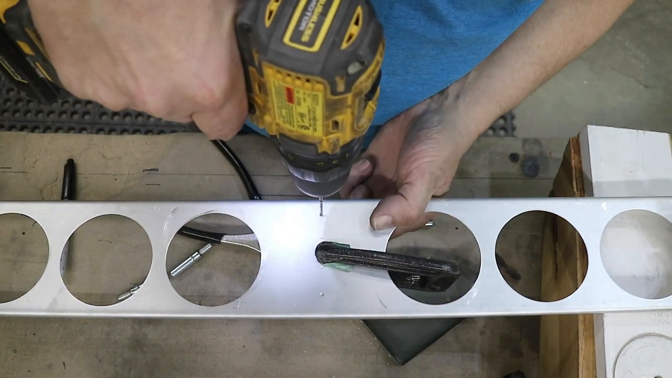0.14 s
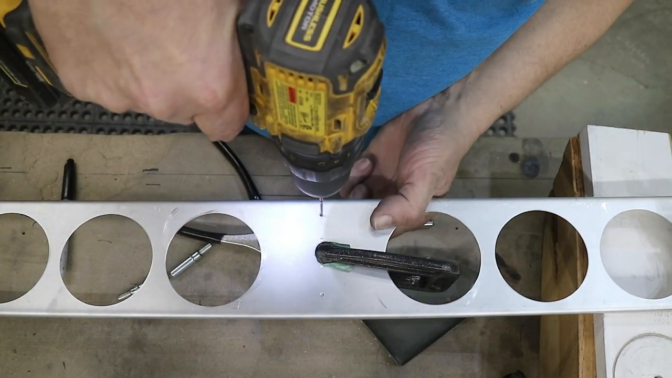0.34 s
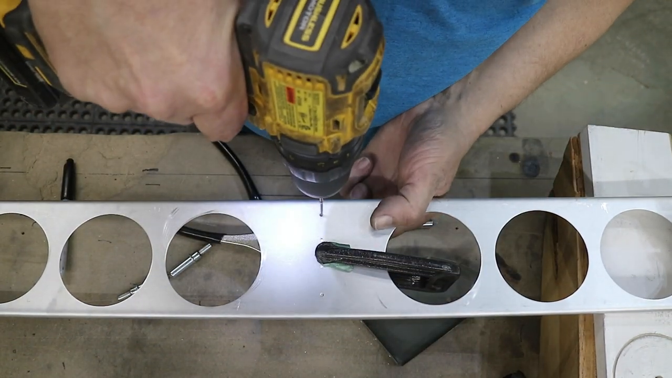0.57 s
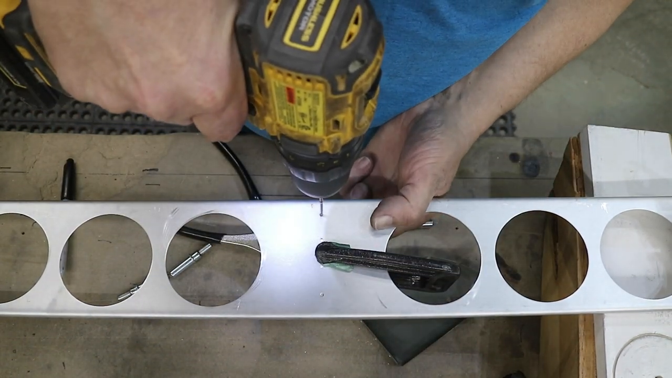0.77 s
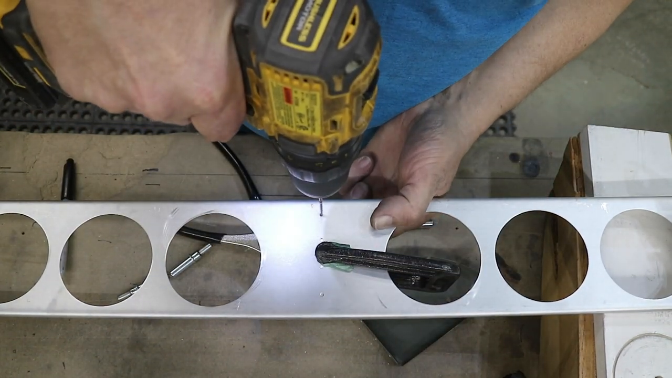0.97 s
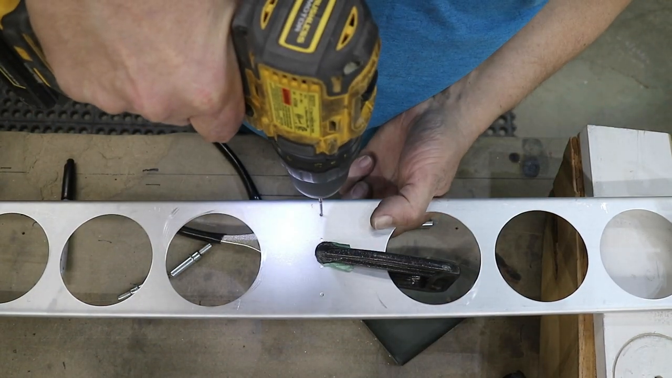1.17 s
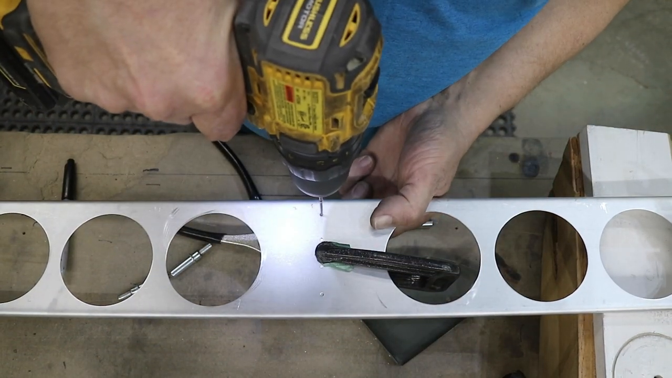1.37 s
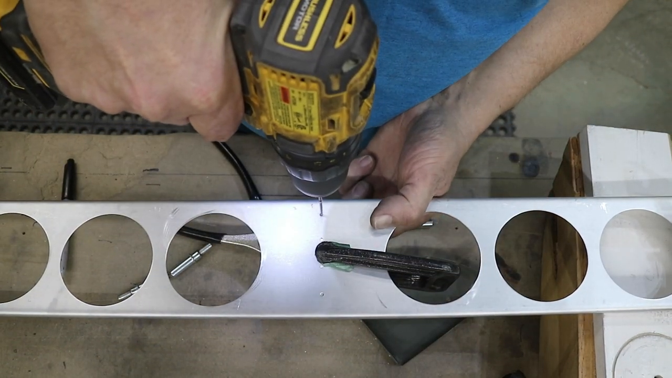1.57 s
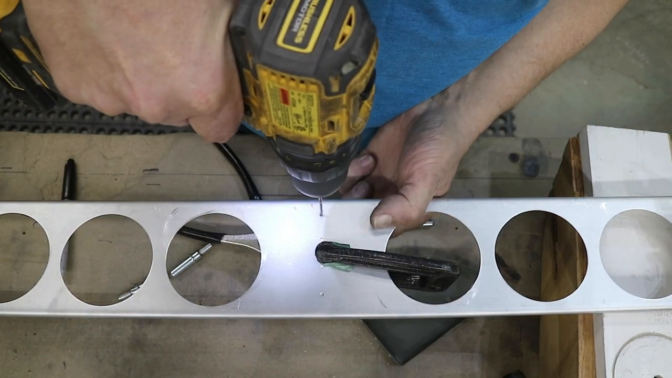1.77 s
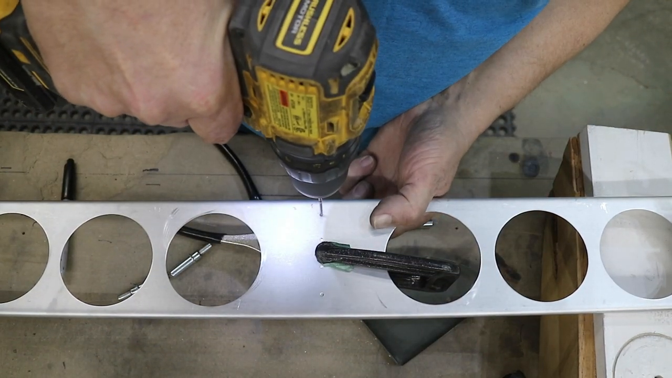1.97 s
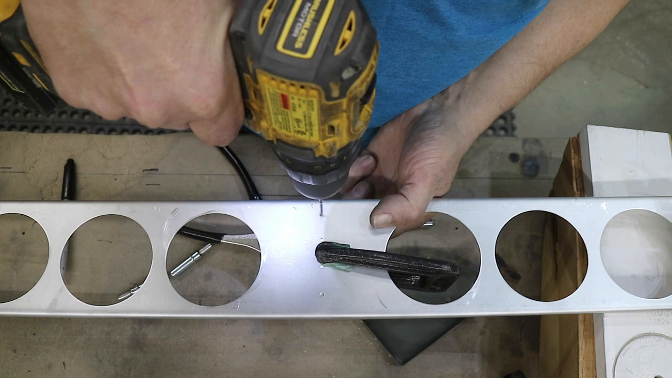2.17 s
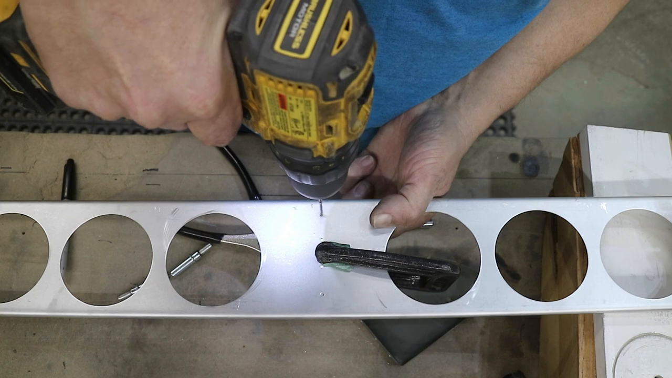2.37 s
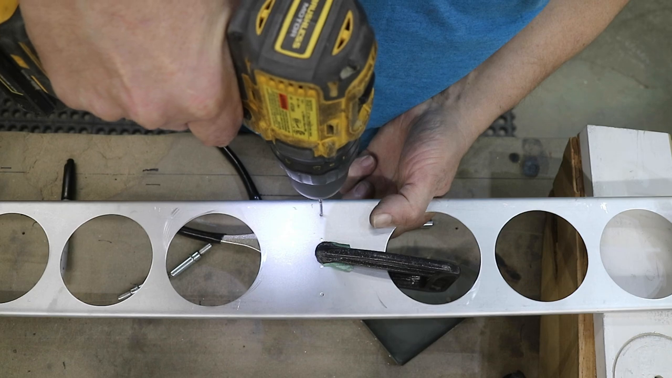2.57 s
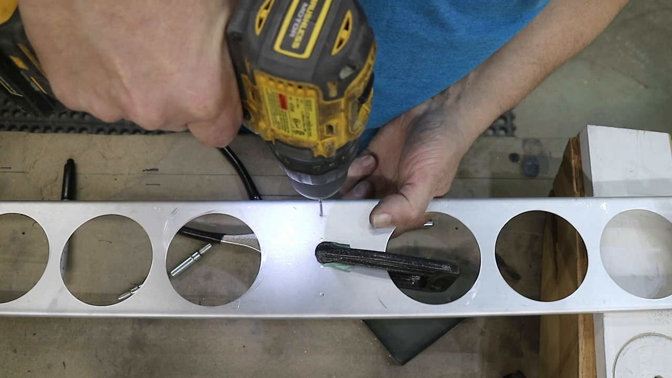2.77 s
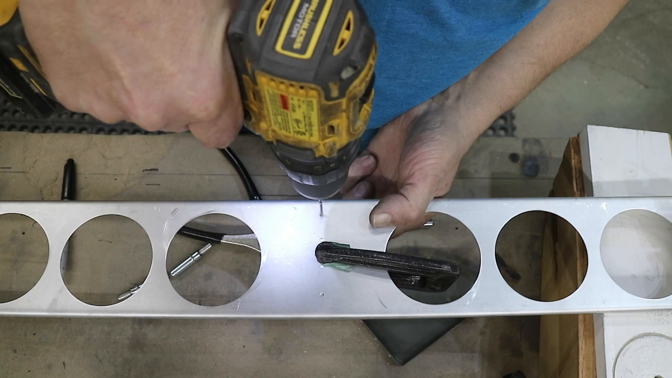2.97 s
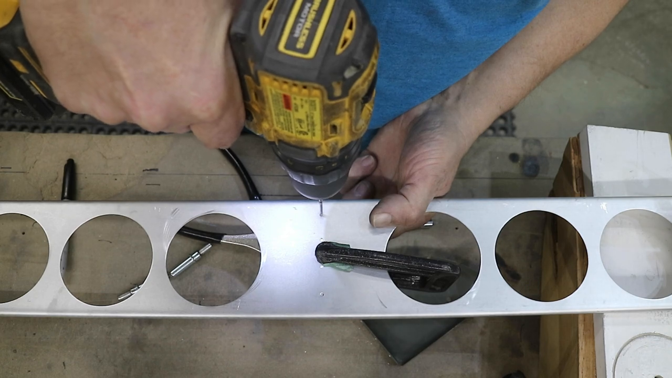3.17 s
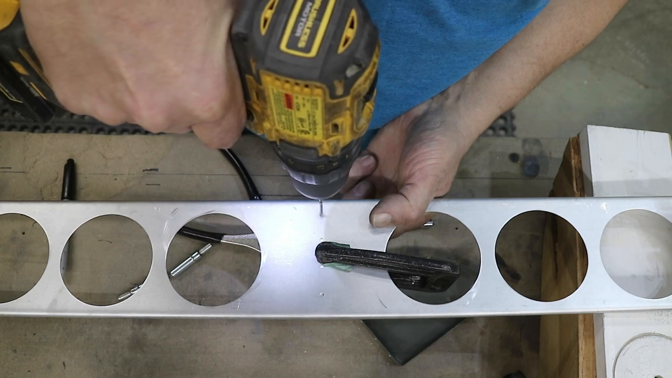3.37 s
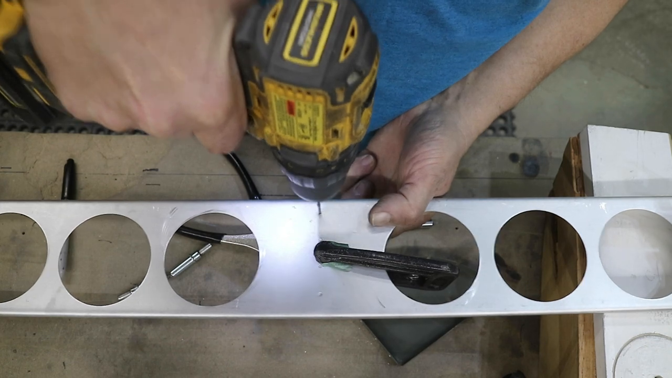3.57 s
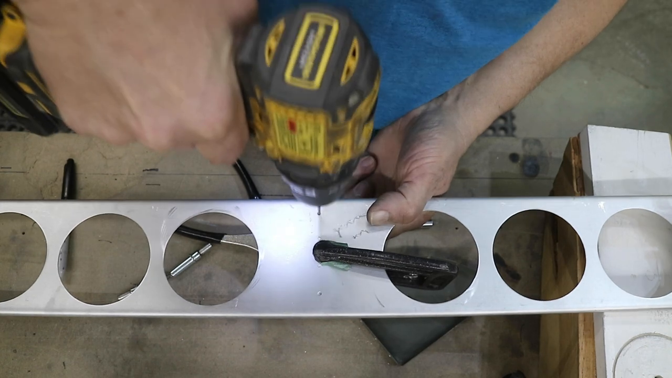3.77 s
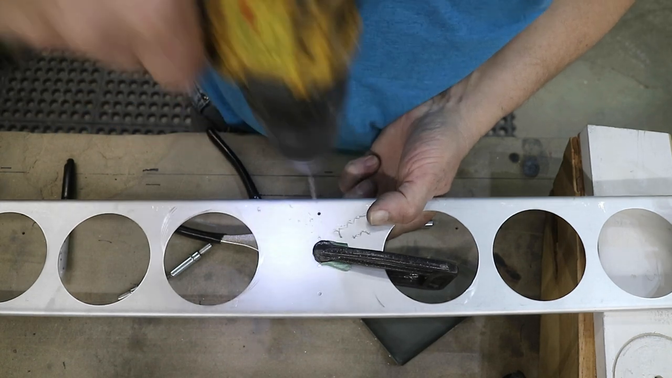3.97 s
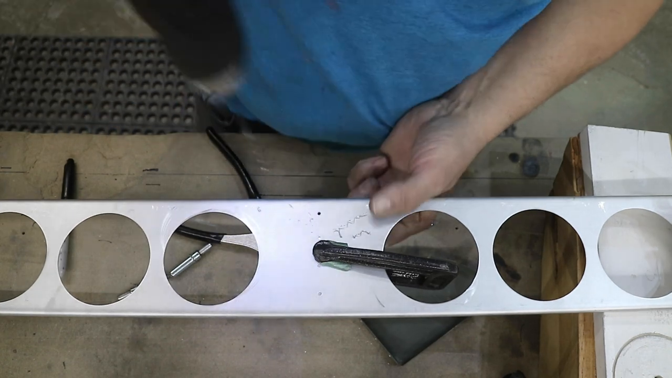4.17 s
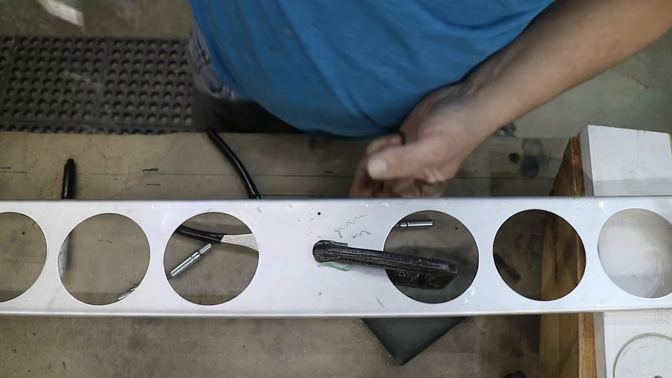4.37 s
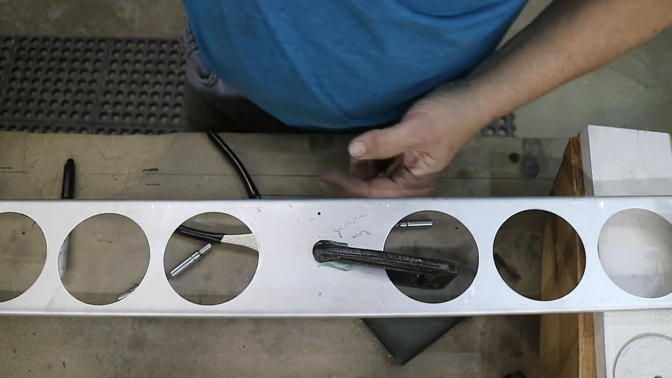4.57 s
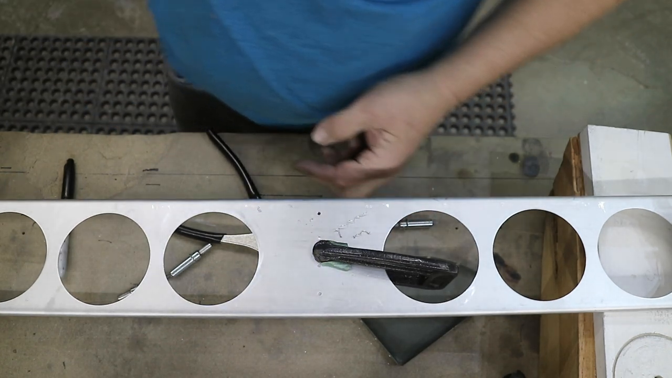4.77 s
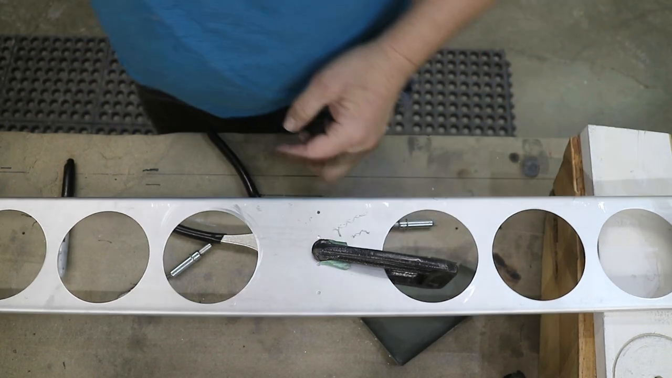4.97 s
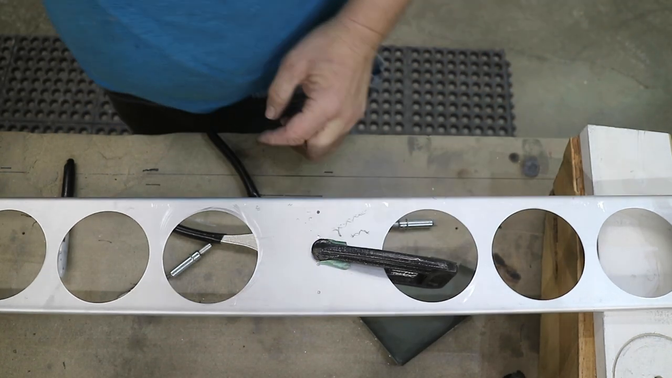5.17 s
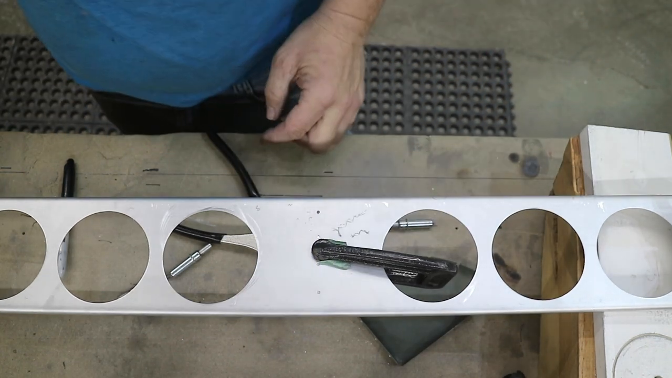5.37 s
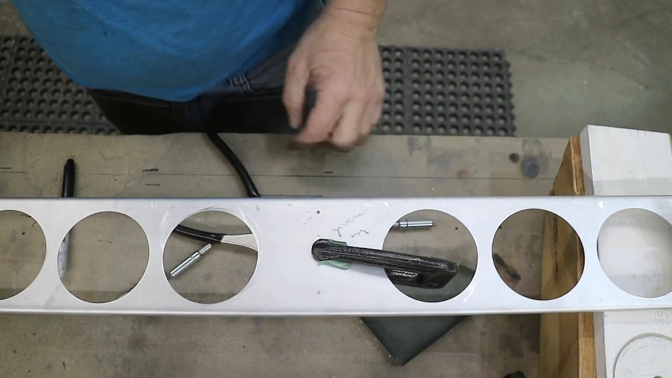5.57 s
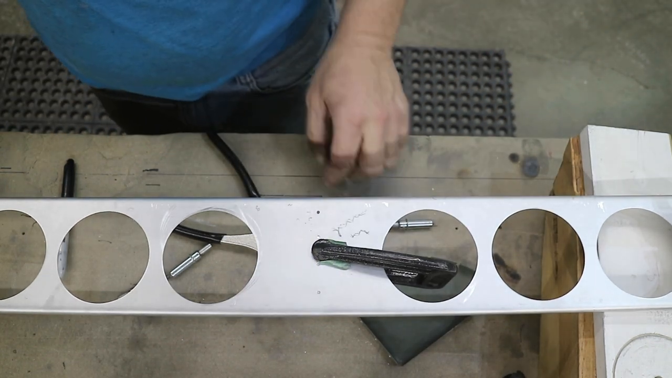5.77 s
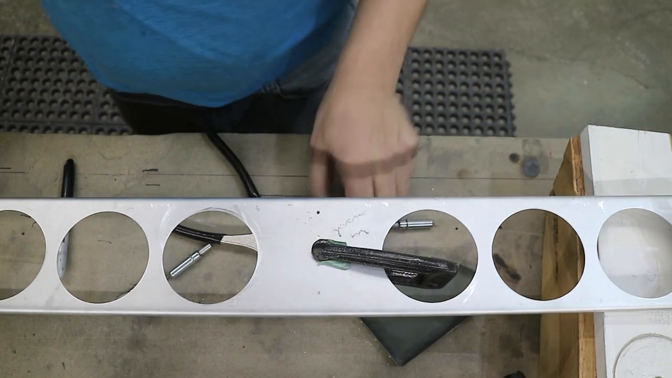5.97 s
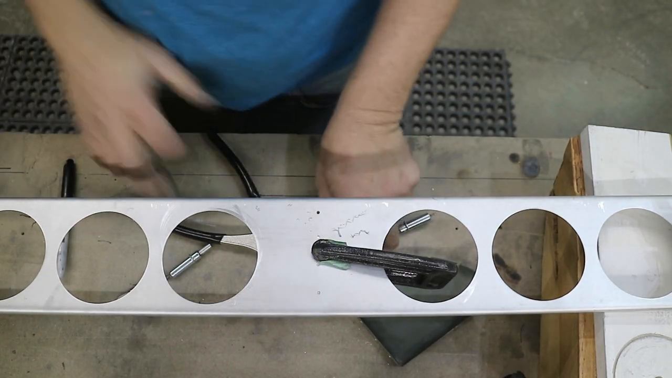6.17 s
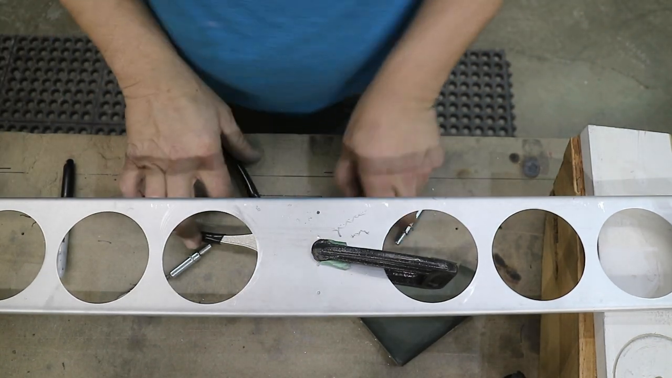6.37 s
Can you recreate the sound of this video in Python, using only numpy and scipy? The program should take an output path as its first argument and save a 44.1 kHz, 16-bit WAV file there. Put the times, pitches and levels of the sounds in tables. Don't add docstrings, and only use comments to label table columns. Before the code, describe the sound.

Close stereo sound in a workshop with a short room ring, faint low air and a thin distant machine tone. From 0 s a cordless drill starts low with a loose, growling chuck and a few light clicks, racing upward to full speed by about 0.5 s. Until 3.6 s it holds a piercing, nearly constant high whine with gear buzz, fan hiss and gritty tearing of thin aluminium. At 3.6 s the bit breaks through; until 3.95 s it snags, shudders and gives several short squeaks, the loudest near 3.85 s. The whine runs free, then brakes from 4.05 s, plunging to a stop with a click at 4.27 s. Quiet follows, with a soft touch at 4.85 s. At 4.95 s the drill knocks hard on the wooden bench and metal clatters brightly until 5.2 s. More woody knocks come at 5.5 s, tiny ticks afterward, then faint bumps and a small dull scrape from 6.1 to 6.4 s.

```python
import sys
import numpy as np
from scipy import signal
from scipy.fft import rfft, irfft, next_fast_len
from scipy.io import wavfile
from scipy.ndimage import map_coordinates

SR = 44100
rng = np.random.default_rng(int(sys.argv[2]) if len(sys.argv) > 2 else 0)


def decibels_to_gain(level_db):
    exponent = np.asarray(level_db, float) / 20
    return 10 ** exponent


def wrap_up_sound(samples):
    columns = np.atleast_2d(samples).T
    tamed = np.clip(columns, -1, 1)
    steps = np.round(tamed * 32767).astype(np.int16)
    wavfile.write(sys.argv[1], SR, steps)


N = 284004
THROUGH_S, BRAKE_S, STOP_S = 3.62, 4.056, 4.275


def unit(x):
    return x / np.sqrt(np.mean(x ** 2) + 1e-20)


def along(points, hz):
    f, v = np.transpose(points)
    return np.interp(np.log(hz + 1), np.log(f + 1), v)


def curves(rows, outside=None):
    s, *cols = np.transpose(rows)
    return [np.interp(np.arange(N) / SR, s, c, outside, outside) for c in cols]


def after(s, fade):
    return np.clip((np.arange(N) / SR - s) / fade, 0, 1)


def swell(s, length):
    return np.sin(np.pi * after(s, length)).clip(0) ** 0.51


def wobble(rate):
    coarse = np.arange(0, N + 16, 16)
    knots = rng.standard_normal(int(N * rate / SR) + 4)
    return np.interp(np.arange(N), coarse, map_coordinates(knots, [coarse * rate / SR]))


def burst(s, length, hz, db):
    return decibels_to_gain(db) * swell(s, length) * np.sin(2 * np.pi * hz * np.arange(N) / SR)


def filtered(x, response):
    m = next_fast_len(N + SR // 4)
    return irfft(rfft(x, m) * response(np.fft.rfftfreq(m, 1 / SR)), m)[..., :N]


def modes(table):
    def response(f):
        total = 0
        for k, (c, w, db) in enumerate(table):
            total = total + (-1) ** k * decibels_to_gain(db) * 1j * f * w / (c * c - f * f + 1j * f * w)
        return total
    return response


# pitch_hz, likeness (1 = the same)
LIKENESS = [(60, 0.68), (180, 0.09), (550, 0.59), (1650, 0.83), (4970, 0.56), (15000, 0.3)]


def rush(gain, grain=1, alike=LIKENESS):
    def middle_and_side(hz):
        turn = np.arccos(np.clip(along(alike, hz), -1, 1)) / 2
        return gain(hz) * [np.cos(turn), np.sin(turn)]
    mid, side = filtered(grain * rng.standard_normal((2, N)), middle_and_side)
    return unit(np.array([mid + side, mid - side]))


# time_s, level_db
AIR_LEVEL = [(0, -52), (4.5, -55.5), (4.78, -53), (4.92, -54.5), (5.9, -52), (6.1, -52.5), (6.44, -52.5)]
# pitch_hz, level_db per Hz
AIR_COLOUR = [(15, -82), (25, -56.5), (86, -10), (183, -18.5), (231, -14), (314, -14), (407, -4),
              (475, -4.5), (930, -7.5), (1030, -8), (1200, -7), (12000, -45), (15600, -95.5), (22000, -120)]
# pitch_hz, level_db
MACHINE_TONE = [(1048, -58)]
# start_s, length_s, pitch_hz, level_db
SOFT_TOUCH = (4.845, .06, 228, -55)


def room_tone():
    level_db, = curves(AIR_LEVEL)
    flutter = decibels_to_gain(1.7 * wobble(17))
    air = rush(lambda hz: decibels_to_gain(along(AIR_COLOUR, hz)), flutter, alike=[(100, .85), (600, 0.14), (3000, -.2)])
    hum = 0
    for hz, db in MACHINE_TONE:
        hum = hum + decibels_to_gain(db + 2.5 * wobble(6)) * np.sin(2 * np.pi * hz * np.arange(N) / SR)
    return decibels_to_gain(level_db + 2.5) * air + hum + burst(*SOFT_TOUCH)


# pitch_hz, time_to_fall_60_db_s
RING_TIME = [(100, 0.82), (400, 0.63), (1500, 0.45), (5000, 0.36), (12000, 0.14)]


def workshop_echo(x):
    out, step = np.zeros((2, N + 2 * SR)), SR * 49 // 100
    for a in range(0, N, step):
        hz, t, z = signal.stft(rng.standard_normal((2, SR * 3 // 4)), SR, nperseg=256)
        decay = decibels_to_gain(-60 * t / along(RING_TIME, hz)[:, None])
        tail = signal.istft(z * decay, SR, nperseg=256)[1]
        tail += 0.2 * tail.sum(axis=0)
        wet = signal.fftconvolve(x[None, a:a + step], tail / np.linalg.norm(tail[0]), axes=1)
        out[:, a + 200:a + 200 + wet.shape[1]] += wet
    return out[:, :N]


# time_s, strength_db
SLIDES = [
    [(4.965, -44), (4.985, -20.5), (5.017, -27.5), (5.085, -20), (5.15, -27), (5.27, -47), (5.417, -48.5),
     (5.453, -58), (5.46, -51)],
    [(6.23, -30), (6.254, -36.5), (6.342, -43.5), (6.362, -42), (6.372, -45.5), (6.44, -55)],
]
# pitch_hz, level_db per Hz
SLIDE_COLOURS = [
    [(290, -28), (500, -9.5), (678, -21.5), (880, -3.5), (1090, -11), (1670, 0.5), (2010, -7), (4470, -13.5), (9220, -31.5), (16000, -46.5)],
    [(150, -48), (250, -19), (375, -4.5), (728, -8), (1240, 0.5), (1890, -7.5), (4920, -22.5), (12000, -74), (15600, -94.5), (22000, -120)],
]
# level_db under its peak, fall_speed (times the clatter's)
SLIDE_TREBLE = [(-9, 1.27), (-9, 2.6)]
# start_s, peak_db,
# pitch_hz
CLICKS = [(0.053, -28, 4020), (.144, -33, 3310), (.224, -33, 3700), (4.258, -21.5, 1500),
          (4.263, -23, 2980), (4.268, -26, 2000), (4.282, -32.5, 3400), (4.9518, -17.5, 5500),
          (5.4842, -29, 2200), (6.2277, -28, 3980), (4.979, -24, 3370), (5.078, -19, 2980),
          (5.107, -10, 3430), (5.227, -48, 7100), (5.305, -54, 6000), (5.331, -40.5, 4980),
          (5.384, -51.5, 6000), (5.41, -48, 3490), (5.44, -53, 3500), (5.461, -38, 3000),
          (5.543, -45.5, 3000), (5.597, -43.5, 3500), (5.648, -45, 3500), (5.569, -45, 8400),
          (5.583, -47.5, 8000), (5.673, -50, 6000), (5.683, -53, 6000), (5.812, -62.5, 7000),
          (5.83, -63, 7500)]


def loose_parts():
    slides = np.zeros((2, N))
    for rows, colour, (under_db, faster) in zip(SLIDES, SLIDE_COLOURS, SLIDE_TREBLE):
        clatter_db, = curves(rows, outside=-120)
        peak_db = clatter_db.max()
        sizzle_db = peak_db + under_db + faster * (clatter_db - peak_db)
        hits = rng.random(N) < 1800 / SR
        shower = hits * decibels_to_gain(4.0 * rng.standard_normal(N)) + .22
        grain, alike = shower * decibels_to_gain(1.3 * wobble(70)), [(1000, 0.94), (3000, 0.43), (8000, 0.24)]
        bright = lambda hz: 1 / (1 + (4000 / (hz + 1)) ** 4)
        clatter = rush(lambda hz: decibels_to_gain(along(colour, hz)) * (1 - bright(hz)), grain, alike)
        sizzle = rush(lambda hz: decibels_to_gain(along(colour, hz)) * bright(hz), grain, alike)
        slides += decibels_to_gain(clatter_db + 1.0) * clatter + decibels_to_gain(sizzle_db) * sizzle
    clicks, t = np.zeros(N + SR), np.arange(SR // 25) / SR
    for s, db, hz in CLICKS:
        band = signal.butter(2, [hz * .55, hz * 1.28], "band", fs=SR)
        snap = unit(signal.lfilter(*band, rng.standard_normal(len(t))))
        clicks[round(s * SR):][:len(t)] += decibels_to_gain(db - 60 * t / 0.0097) * snap
    return slides, clicks[:N]


# start_s, peak_db, crack_db, thump_hz, bench_ring_db
BLOWS = [(4.9498, -21.5, 4, 318, -2.5), (4.9519, -8, 0.5, 318, -10), (5.0093, -12, -19, 330, -6),
         (5.0133, -8, -17, 342, -12), (5.4843, -11.5, -5.5, 514, -3), (5.488, -14.5, -9, 270, -8),
         (5.5, -18, -13.5, 405, -7), (5.516, -19, -6, 324, -10.5), (5.526, -16, -9.5, 387, -6),
         (5.675, -28.5, -3.5, 304, -4), (6.111, -36.5, -9, 430, -5.5), (6.125, -43, -12, 440, -3),
         (6.145, -36, -13, 440, -8), (6.19, -41.5, -10, 442, -11), (6.2143, -34, 4, 450, -16),
         (6.2275, -30.5, 10, 423, -21), (6.358, -34, 2, 475, -17)]
# pitch_hz, width_hz, level_db
BENCH_MODES = [(90.2, 14, 13.5), (176, 27, -0.5), (299, 66, -4.5), (480, 98, -5), (760, 290, -5.5),
               (1310, 410, -12.5), (2000, 550, -15)]


def bench_knocks():
    near, blows, t = np.zeros(N + SR), np.zeros(N + SR), np.arange(SR // 8) / SR
    for s, db, crack_db, hz, ring_db in BLOWS:
        thump = decibels_to_gain(-60 * t / 0.034) * np.sin(2 * np.pi * hz * t) * (1 - np.exp(-t / 0.00028))
        top_hz = 1900 * decibels_to_gain(0.51 * crack_db)
        band = signal.butter(3, [350, 1.39 * top_hz], "band", fs=SR)
        crack = unit(signal.lfilter(*band, rng.standard_normal(len(t))))
        near[round(s * SR):][:len(t)] += decibels_to_gain(db) * (thump + decibels_to_gain(crack_db - 60 * t / 0.017) * crack)
        push = decibels_to_gain(db + ring_db + 18 - 60 * t / 0.05) * rng.standard_normal(len(t))
        blows[round(s * SR):][:len(t)] += push

    def wood(hz):
        softened = modes(BENCH_MODES)(hz) / (1 + 1j * hz / 2600) ** 2
        return softened * (1j * hz / (75 + 1j * hz)) ** 4
    ring = filtered(blows[:N], wood)
    near = filtered(near[:N], lambda hz: (1j * hz / (90 + 1j * hz)) ** 2)
    airborne = filtered(ring, lambda hz: 1j * hz / (120 + 1j * hz))
    return near + decibels_to_gain(1.5) * ring, decibels_to_gain(-9) * near + airborne


# start_s, length_s, shake_db, drag_db
SNAGS = [
    (3.585, 0.12, -46.5, -39),
    (3.68, 0.15, -41, -40.5),
    (3.815, .07, -40, -43.5),
    (3.867, 0.1, -58, -48.5),
]
# start_s, length_s, pitch_hz, level_db
SQUEALS = [
    (3.595, .05, 1680, -27),
    (3.715, .05, 2050, -27),
    (3.8, .085, 1630, -22.5),
    (3.845, .05, 1890, -19),
    (3.89, .04, 1900, -23),
]


def pull_out():
    shake = rush(lambda hz: abs(modes([(72, 26, 0)])(hz)) ** 2, alike=[(70, .9)])
    drag = rush(lambda hz: abs(modes([(260, 420, 0)])(hz)) ** 2, decibels_to_gain(1.6 * wobble(60)))
    squeal = sum(burst(*row) for row in SQUEALS) * decibels_to_gain(1.8 * wobble(90))
    sound = squeal
    for s, length, shake_db, drag_db in SNAGS:
        sound = sound + swell(s, length) ** 2.5 * (decibels_to_gain(shake_db) * shake + decibels_to_gain(drag_db) * drag)
    return sound


# time_s, shaft_turns_per_s
TRIGGER = [(0, 40), (.2, 105), (.28, 165), (.325, 230), (.36, 262), (.38, 306)]
# time_s, shaft_turns_per_s
FULL_SPEED = [(.8, 428.4), (1.6, 429), (2, 430), (3.62, 426.8), (3.8, 430), (4, 433)]


def shaft():
    t, (squeeze,), (full,) = np.arange(N) / SR, curves(TRIGGER), curves(FULL_SPEED)
    settle_s, brake_per_s2, knee_s = .054, 1950, .017
    speed = full - (full - squeeze) * np.exp(-(t - TRIGGER[-1][0]).clip(0) / settle_s)
    lost = brake_per_s2 * knee_s * np.logaddexp(0, (t - BRAKE_S) / knee_s)
    return (speed - lost).clip(TRIGGER[0][1])


# start_s, length_s, change_db
GRIP_SHIFTS = [
    (.4, .13, 4),
    (0.536, 0.12, -8),
    (3.593, 0.095, -13),
    (3.798, .09, -9.5),
    (3.973, 0.12, 4.5),
]
SHAFT_TONES = [1, 1.613, 2, 2.758, 3, 9, 16, 21]
# level_db, unsteadiness_db
SHAFT_TONE_LEVELS = [(-17, 1.5), (-21, 4), (-18, 2), (-10, 2), (-16, 3), (-16.5, 1.5), (-14, 3), (-19, 5)]
# pitch_hz, level_db
SHELL = [(200, -11.5), (500, -3.5), (900, 1.5), (1800, -2.5), (3900, 1), (6900, -14), (9000, -10.5)]
# multiple, start_s, length_s, level_db
FLARES = [(16, .245, .04, -39), (16, .308, .032, -17), (16, .33, .04, -27), (4, .24, .12, -40),
          (4.7, .408, .065, -23), (10, .41, .07, -29), (9.85, 4.055, .09, -29), (5, 4.095, .045, -33),
          (4, 4.13, .075, -38), (16, 4.135, .04, -37)]


def motor_whine(speed, coast_db):
    turns = np.cumsum(speed * (1 + 0.001 * wobble(25))) / SR
    ear_shift = np.array([[.05], [-.05]])
    tone = lambda k: np.sin(2 * np.pi * k * turns + rng.uniform(0, 2 * np.pi) + k * ear_shift)
    slow_db = 75.5 * np.log10(8 * speed / 3030).clip(None, 0)
    grip_db = sum(db * swell(s, length) ** 3 for s, length, db in GRIP_SHIFTS)
    whine = decibels_to_gain(-20 + coast_db + slow_db + grip_db + 1.6 * wobble(25)) * tone(8)
    rise_db = 55 * np.log10(speed / speed.max()) - 20
    rise_db = rise_db - 2.5 * after(THROUGH_S, .15)
    for k, (db, loose_db) in zip(SHAFT_TONES, SHAFT_TONE_LEVELS):
        whine += decibels_to_gain(db + rise_db + along(SHELL, k * speed) + loose_db * wobble(35)) * tone(k)
    for k, s, length, db in FLARES:
        whine += swell(s, length) * decibels_to_gain(db + 4.5 + 0.82 * wobble(80)) * tone(k)
    return whine, turns


# start_s, length_s, level_db
CHUCK_SWELL = (0.397, 0.1, 14)


def loose_chuck(tenfold, chips):
    loose_db = 11 * tenfold - 80 * after(.54, .1)
    start_s, length_s, flare_db = CHUCK_SWELL
    song_db, growl_db = -35.5 + loose_db + flare_db * swell(start_s, length_s) ** 3, -35.5 + loose_db
    song = rush(lambda hz: abs(modes([(1780, 55, 0)])(hz)) ** 2)
    growl = rush(lambda hz: abs(modes([(720, 550, 0)])(hz)) ** 2, chips)
    return decibels_to_gain(song_db) * song + decibels_to_gain(growl_db) * growl


# time_s, effort_db
MOTOR_EFFORT = [(0, -4), (.13, -4), (.15, 2.5), (.2, -9), (.22, 5), (.25, -0.5), (.41, 1), (.5, 0), (.8, 1),
                (2.1, -0.5), (2.4, 0.5), (3.54, 0), (3.61, 2), (3.86, 0.5), (3.97, -4), (4.04, -3.5),
                (4.07, -1), (4.22, 1.5)]
# full_speed_db, slope_db per tenfold speed, effort_share, change_db once through
CUT_LEVEL = (-23.5, 18.5, 0.78, .5)
GEAR_LEVEL = (-25, 13, 0.82, -3.5)
FAN_LEVEL = (-29, 18, 0.63, -2)
# pitch_hz, level_db per Hz
CUT_COLOUR = [(35, -68.5), (60, -40), (356, -26), (424, -17.5), (459, -14.5), (681, -11), (784, -13),
              (835, -8.5), (1160, -4), (2600, -9.5), (3380, -17.5), (5720, -120)]
GEAR_COLOUR = [(1290, -43.5), (2200, -15), (3090, -7.5), (3320, -7.5), (3540, -3.5), (3600, -3),
               (5200, -20.5), (6760, -43), (11400, -120)]
FAN_COLOUR = [(2650, -28.5), (4500, -3), (5170, -2), (6420, -8), (7030, -7.5), (8510, -13), (9260, -7.5),
              (10000, -17), (13800, -27.5), (15200, -26.5), (16000, -34)]
# pitch_hz, width_hz, level_db
RIB_MODES = [(1384, 60, 2.5), (1761, 57, 5), (2000, 55, 2.5)]
# pitch_hz, left_minus_right_db
SIDE_BALANCE = [(60, 6), (180, -4.5), (550, 4), (1650, 1), (4970, 2), (15000, -2)]


def drill():
    speed, (effort_db,) = shaft(), curves(MOTOR_EFFORT)
    tenfold = np.log10(speed / speed.max())
    stop_db = -45 * after(STOP_S, 0.017) - 60 * after(STOP_S, .4)
    free = after(THROUGH_S, .15) - after(BRAKE_S, .06)
    coast_db = -11 * after(BRAKE_S, .06)
    spin_db = 3.5 * (1 - after(.42, .08)) * after(.15, .15)

    def level(full_db, slope_db, share, through_db):
        return full_db + slope_db * tenfold + share * effort_db + through_db * free + stop_db
    whine, turns = motor_whine(speed, coast_db)
    carrier = decibels_to_gain(0.69 * np.sin(2 * np.pi * turns / 3.9) + 0.82 * wobble(300) + 0.56 * wobble(9))
    chips = decibels_to_gain(1.2 * wobble(150) + 0.55 * wobble(12))
    cut = rush(lambda hz: decibels_to_gain(along(CUT_COLOUR, hz)) * (1 + 1.49 * abs(modes(RIB_MODES)(hz))), chips)
    gear = rush(lambda hz: decibels_to_gain(along(GEAR_COLOUR, hz)), carrier)
    fan = rush(lambda hz: decibels_to_gain(along(FAN_COLOUR, hz)), carrier)
    noise = decibels_to_gain(level(*CUT_LEVEL) + coast_db / 4) * cut
    noise = noise + decibels_to_gain(level(*GEAR_LEVEL) + spin_db) * gear + decibels_to_gain(level(*FAN_LEVEL) + spin_db) * fan
    noise = noise + loose_chuck(tenfold, chips)
    halves = np.array([[.5], [-.5]])
    return filtered(np.array([whine, noise]), lambda hz: decibels_to_gain(along(SIDE_BALANCE, hz) * halves))


def scene():
    (whine, noise), (blow, send), (slide, click) = drill(), bench_knocks(), loose_parts()
    noise = noise + pull_out()
    to_room = decibels_to_gain(-11) * noise.mean(axis=0) + decibels_to_gain(1.0) * send + decibels_to_gain(-8.5) * slide[0] + decibels_to_gain(-5.0) * click
    wet = workshop_echo(to_room)
    lead = lambda hz: 0.88 * np.tanh(np.pi * hz * .0003 / .75)
    bench = filtered(slide + blow + click, lambda hz: np.exp(1j * lead(hz) * np.array([[1], [-1]])))
    return whine + noise + (bench + wet + room_tone()) * decibels_to_gain([[.7], [-.7]])


def top_cut(x):
    return signal.sosfilt(signal.butter(12, 16650, fs=SR, output="sos"), x)


def record(dry):
    heard = filtered(dry, lambda hz: (1j * hz / (55 + 1j * hz)) ** 2 * (hz < 15790))
    return top_cut(heard)


dry = scene()
out = record(dry)
wrap_up_sound(out)
```